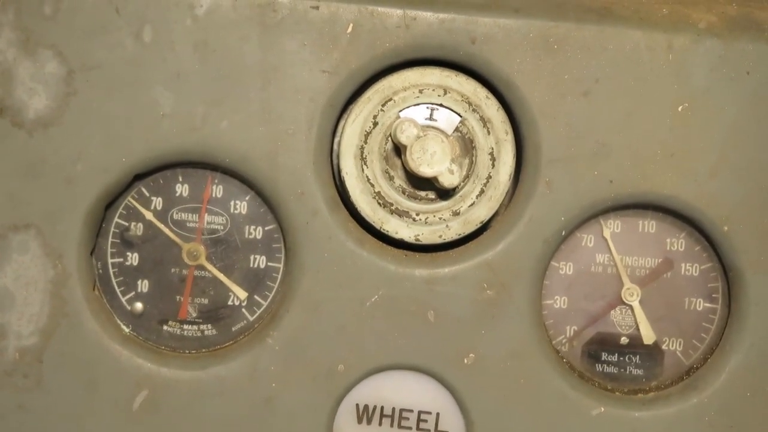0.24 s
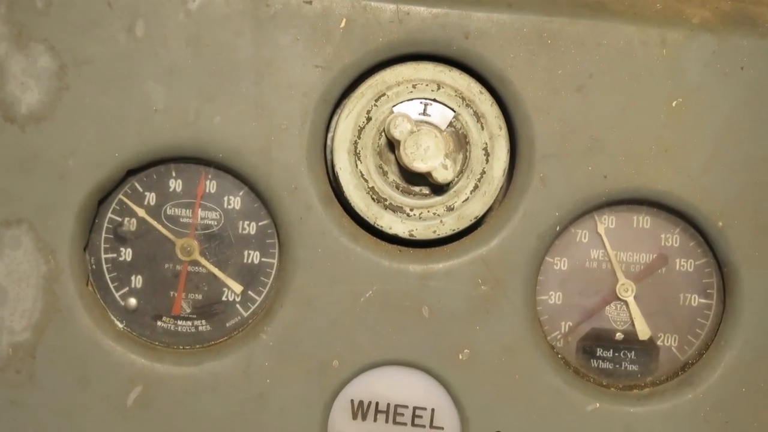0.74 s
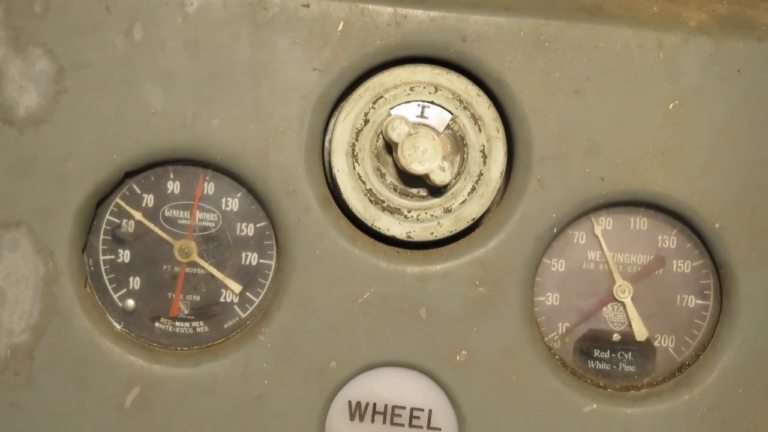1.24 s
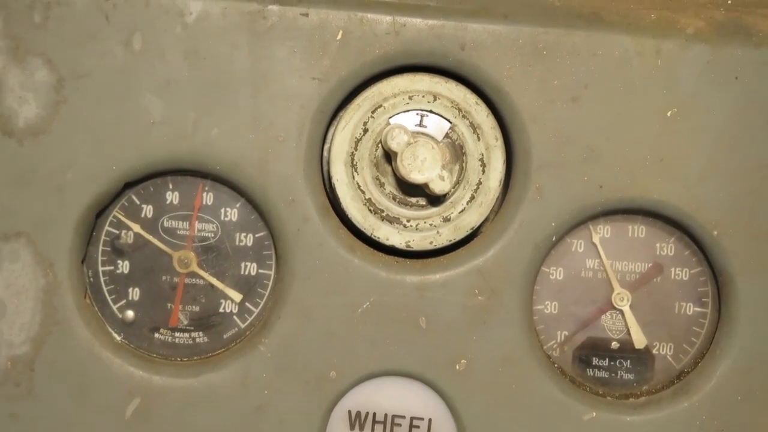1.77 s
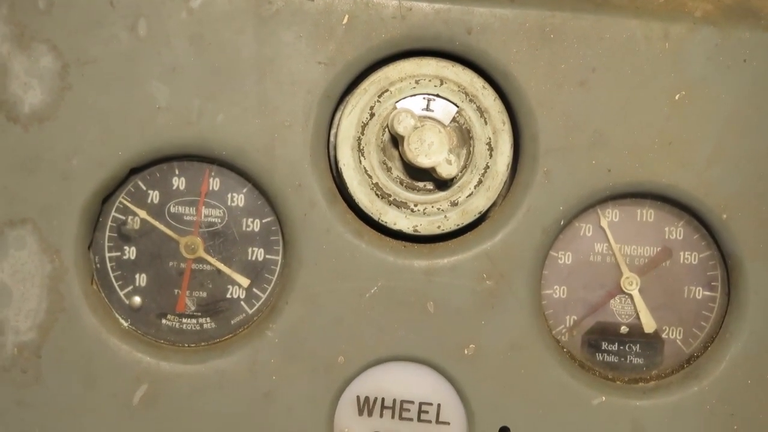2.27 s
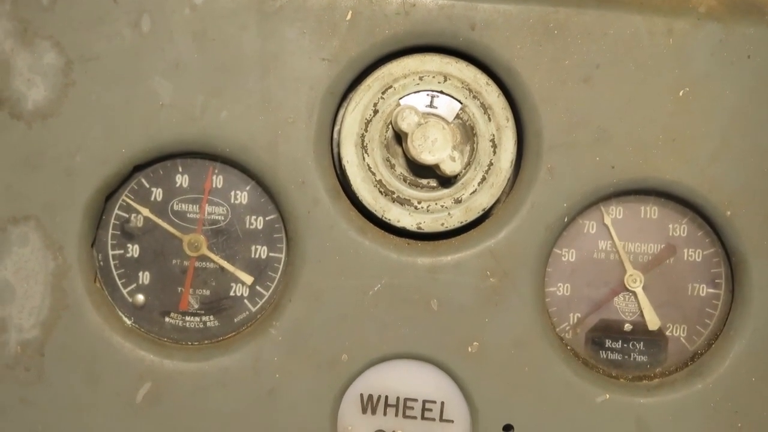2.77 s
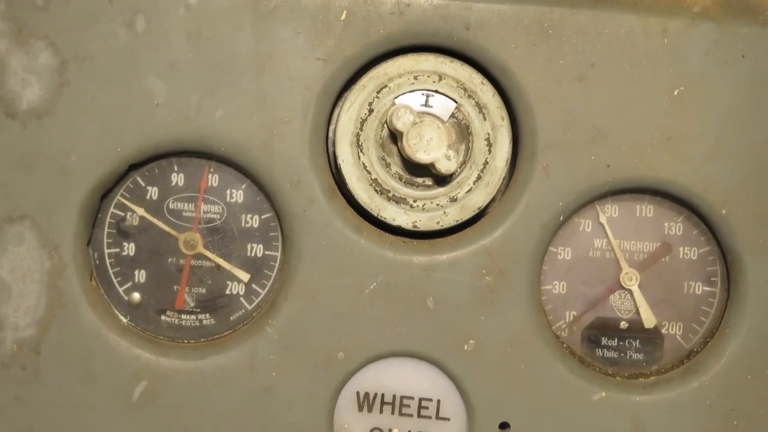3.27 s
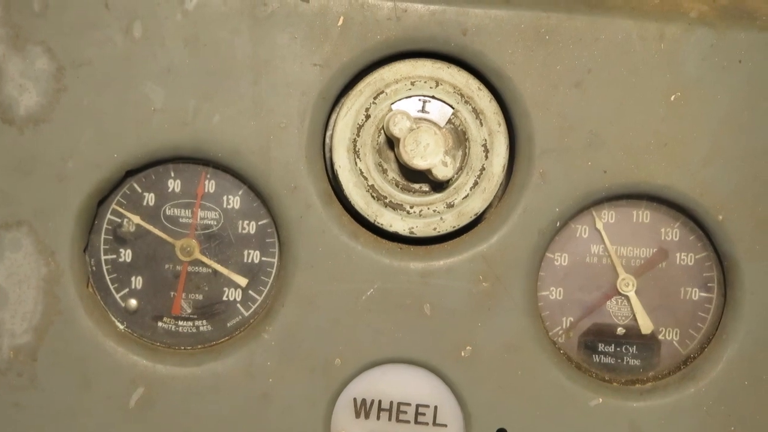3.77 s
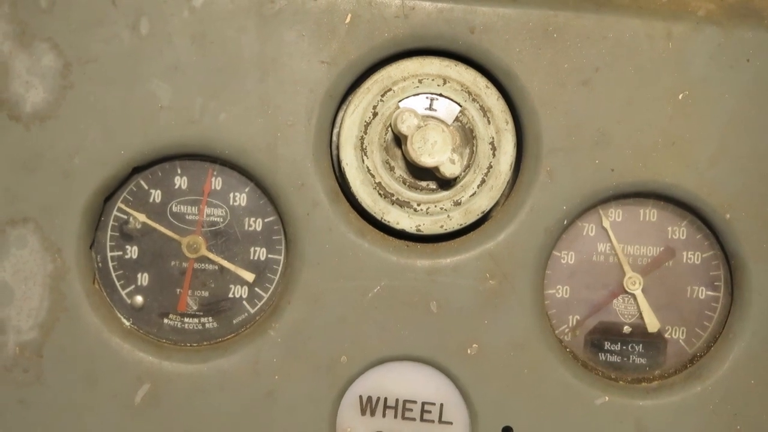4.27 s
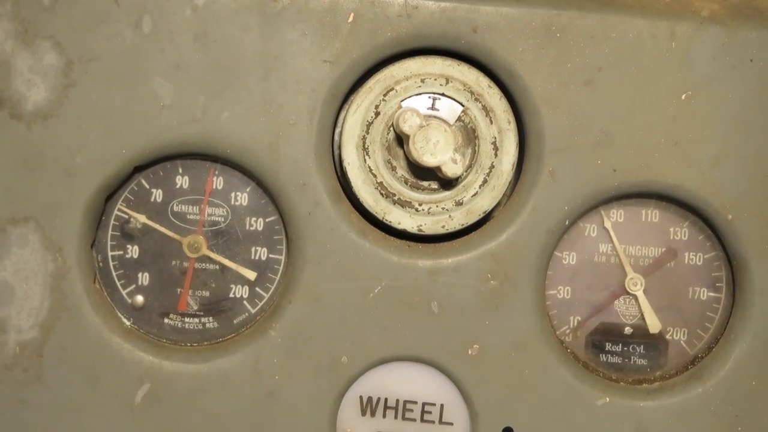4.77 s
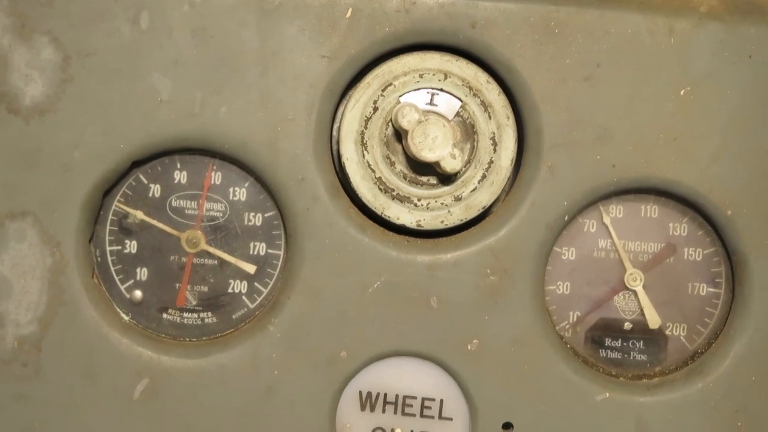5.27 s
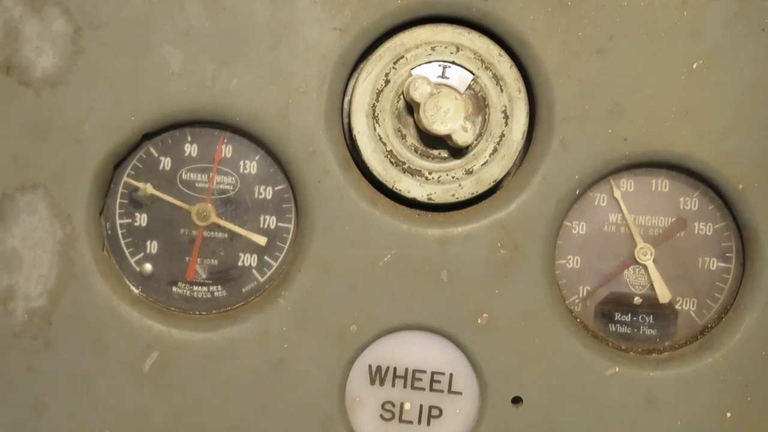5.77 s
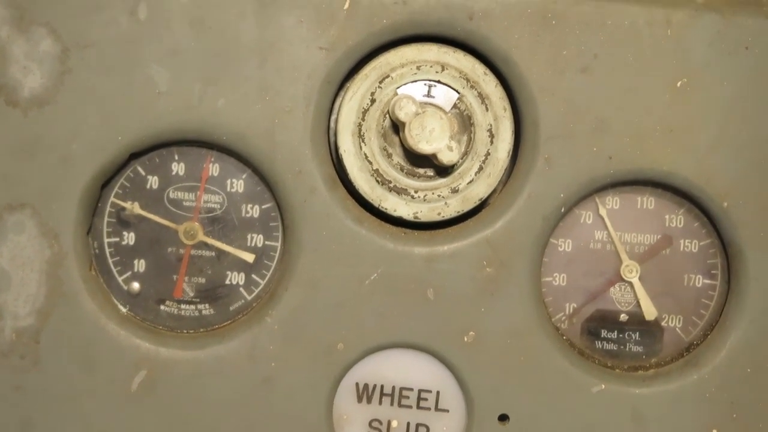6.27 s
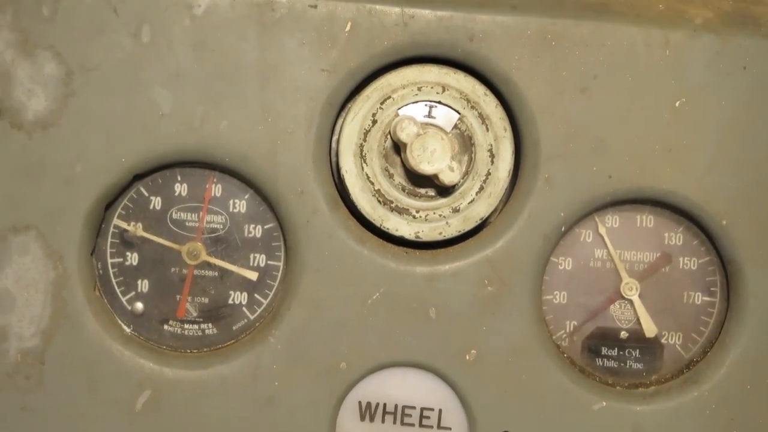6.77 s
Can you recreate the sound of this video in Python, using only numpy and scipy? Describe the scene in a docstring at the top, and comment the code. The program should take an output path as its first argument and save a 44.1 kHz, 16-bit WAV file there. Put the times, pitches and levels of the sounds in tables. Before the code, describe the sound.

Close in a hard steel locomotive cab, compressed air vents through a brake valve as a loud, bright, whistling hiss. Its screechy band slides gradually downward for six seconds. The valve then shuts abruptly, treble vanishing first, leaving a short metallic ring and a dull fading leak. Low idling diesel hum, fans and faint hiss then rise slightly as the microphone's automatic gain recovers.

```python
"""Compressed air vents through a brake valve in the cab of an idling diesel locomotive.
Shaped noise rings the valve body and its exhaust pipe; its brightest band, a screech, slides down over six seconds.
Panel resonances and a short, hard ring, both noise colours or noise tails, place the jet in the steel cab.
Then the valve closes: the treble goes first, then the rest, down to a dull, dying leak.
The camera's gain control waits, then lifts what is left: summed engine tones, noise of fans and a faint hiss."""
import sys
import numpy as np
from scipy import signal
from scipy.fft import rfft, irfft
from scipy.io import wavfile
from scipy.ndimage import uniform_filter1d, map_coordinates

SR = 44100
rng = np.random.default_rng(int(sys.argv[2]) if len(sys.argv) > 2 else 0)


def wrap_up_sound(samples):
    """Save the sound to the file named by the first command line argument, as 16-bit audio."""
    columns = np.atleast_2d(samples).T
    # keep every value between -1 and 1, then stretch to whole-number steps
    tamed = np.clip(columns, -1, 1)
    steps = np.round(tamed * 32767).astype(np.int16)
    wavfile.write(sys.argv[1], SR, steps)


N = 309582
TIME = np.arange(N) / SR
FREQ = np.fft.rfftfreq(2 * N, 1 / SR)

# the open valve: level of the jet at the start, and its slow sag as the air drains
JET_DB, SAG_DB_PER_S = -15.5, 0.103
# the valve first throttles the treble of the jet, then drops onto its seat
THROTTLE_AT_S, THROTTLE_DB_PER_S, THROTTLE_EDGE_HZ = 5.996, 65, 2000
SEAT_AT_S, SEAT_DB_PER_S = 6.055, 378
# the leak past the seat: level against the jet ahead of its own colour, and fade on top of the sag
LEAK_DB, LEAK_FADE_DB_PER_S = -24, 33
# time constant with which the screech flattens once the valve throttles
PEAK_COLLAPSE_S = 0.0061
# the low ring of the pipe weakens as the air drains: lift at the start, sag, upper edge
RING_DB, RING_SAG_DB_PER_S, RING_EDGE_HZ = 2, 0.5, 2200
# the middle whistle swells and sags about twice a second: band, first crest, rate, depth either way
SWELL_HZ, SWELL_WIDTH_HZ = 1680, 98
SWELL_AT_S, SWELLS_PER_S, SWELL_DB = 0.2, 1.9, 1
# all standing waves between the panels are equally sharp
STANDING_WIDTH_HZ = 19.3
# the fringe of the plume hisses apart from its core: level against the core
FRINGE_DB = -5
# steady levels in the cab, ahead of the gain control
ENGINE_DB, CAB_AIR_DB, HIGH_HISS_DB = -68, -66.5, -61
SHAFT_HZ = 18.82
# gain control: low while the sound is over the threshold; after a hold it jumps up, then creeps on
THRESHOLD_DB, HOLD_S = -33, 0.38
JUMP_DB, JUMP_S, CREEP_DB_PER_S = 6.5, 0.022, 5.5
TOP_HZ = 15200


def undb(db):
    """Decibels to gain."""
    return 10 ** (np.asarray(db) / 20)


def unit(x):
    """Scale to rms 1."""
    return x / np.sqrt(np.mean(x ** 2))


def since(start_s):
    """Seconds gone by after a moment, zero before it."""
    return np.maximum(TIME - start_s, 0)


def spectrum(x):
    """Spectrum of a sound followed by silence, leaving room for filters to ring out."""
    return rfft(x, 2 * N)


def wave(bins):
    """Back from a spectrum to sound."""
    return irfft(bins)[..., :N]


def colour(points):
    """Gain at every frequency from (Hz, dB) points."""
    hz, db = np.transpose(points)
    return undb(np.interp(np.log(FREQ + 1), np.log(hz), db))


def bell(hz, width):
    """Steep-sided power response of one resonance, down to a quarter one width from its centre."""
    return 1 / (1 + ((FREQ - hz) / width) ** 2) ** 2


def noise(gain):
    """Noise of rms 1 with the given gain over frequency."""
    return unit(wave(rfft(rng.standard_normal(2 * N)) * gain))


def walk(rate):
    """Smooth random drift of spread 1, with about rate turns a second."""
    return noise(1 / (1 + (FREQ / rate) ** 2))


def jet_colour(low_edge_hz=170):
    """Gain of the jet over frequency: broad turbulence plus resonances, notched where the pipe cancels."""
    # Broad colour of the jet. Each row: frequency in Hz, level in dB.
    broad = [(100, -85), (400, -41.5), (480, -33.5), (720, -25.5), (900, -28.0), (1150, -24), (1400, -16.5),
             (1850, -16.5), (2150, -12.5), (2900, -17), (4150, -6.5), (4750, -11.5), (5300, -4.5),
             (7700, -16), (9400, -11.5), (12000, -2.5), (13500, -2), (15100, -14)]
    # Resonances of valve body and pipe; the two upper whistles are clusters of close, beating strands.
    # Each row: frequency in Hz, width in Hz, level in dB.
    pipe_modes = [(604.7, 19, -10), (1019, 14, -20.5), (1433, 15, -13), (1572, 13.6, -4), (1655, 14, 2),
                  (1672.4, 15.6, -1.5), (1714, 13, -8), (2410, 45, -13.5), (3260, 31, -7), (3501, 22, 0),
                  (3555, 51, 1.5), (3622, 29, -3), (3682, 36, -1.2), (5530, 420, -7), (6100, 440, -7),
                  (6450, 170, 0), (6953, 69, -1), (7730, 156, -2.5), (7970, 94, -6.5), (8790, 290, -4),
                  (10130, 221, 0.5), (11090, 167, -2), (12750, 200, 2), (14300, 98, -7)]
    # Strongest standing waves between the steel panels. Each row: frequency in Hz, level in dB.
    standing_waves = [(5057, 0.5), (5135, -1), (5250, -2), (5340, -0.5), (5491, 3.5), (5545, 0.5),
                      (5803, 2.5), (5943, 3.5), (6266, 0), (6465, 3), (6557, 6), (6939, -0.5), (8796, 4.5),
                      (10191, 4.5), (11138, 4.5), (11332, 6.5), (11488, 7), (12812, 5.5), (12941, 6.5)]
    # Anti-resonances of the pipe. Each row: frequency in Hz, width in Hz, change in dB.
    pipe_nulls = [(1750, 30, -4), (3130, 66, -3.5), (4400, 170, -1), (6870, 70, -3), (7410, 129, -36),
                  (8330, 95, -14), (9640, 70, -10), (10700, 150, -5), (12240, 110, -13)]
    power = colour(broad) ** 2
    power = power + sum(undb(db) ** 2 * bell(hz, width) for hz, width, db in pipe_modes)
    power = power + sum(undb(db) ** 2 * bell(hz, STANDING_WIDTH_HZ) for hz, db in standing_waves)
    nulls_db = sum(db * bell(hz, width) for hz, width, db in pipe_nulls)
    low_cut = FREQ ** 2 / (FREQ ** 2 + low_edge_hz ** 2)
    return np.sqrt(power) * undb(nulls_db) * low_cut


def screech(hz, s, surge=0.066):
    """Lift in dB of the jet's brightest band, which slides down over six seconds and flattens at the throttle."""
    # A narrow screech that breaks, widens and slides down.
    # Each row: time in seconds, centre in Hz, lift in dB, width in octaves.
    jet_peak = [(0, 7100, 6, 0.21), (1.9, 6660, 6, 0.28), (2.2, 6240, 4, 0.28), (3.1, 5100, 3.5, 0.72),
                (4.1, 4200, 3.5, 0.64), (5, 4040, 5, 0.77), (6, 3650, 5, 0.58)]
    times, *columns = np.transpose(jet_peak)
    centre_hz, lift_db, octaves = (np.interp(s, times, column) for column in columns)
    collapse = np.exp(-np.maximum(s - THROTTLE_AT_S, 0) / PEAK_COLLAPSE_S)
    surges = 1 + surge * np.interp(s, TIME, walk(3.9))
    band = np.exp(-(np.log2(hz / centre_hz) / octaves) ** 2)
    return lift_db * surges * collapse * band


def jet(flutter_db=0.37, flutter_hz=25, patchy_db=0.93):
    """Turbulent air rings the pipe, while its brightest band slides down and its eddies make it patchy."""
    air = noise(jet_colour())
    hz, s, frames = signal.stft(air, SR, nperseg=512)
    hz = hz[:, None] + 1  # keeps the logarithm finite
    ring_db = (RING_DB - RING_SAG_DB_PER_S * s) / (1 + (hz / RING_EDGE_HZ) ** 2) ** 2
    swell_band = np.exp(-((hz - SWELL_HZ) / SWELL_WIDTH_HZ) ** 2)
    swell_db = SWELL_DB * np.cos(2 * np.pi * SWELLS_PER_S * (s - SWELL_AT_S)) * swell_band
    # eddies make neighbouring bands swell and sag together
    eddies = uniform_filter1d(rng.standard_normal(frames.shape), size=24, axis=0)
    eddies = unit(uniform_filter1d(eddies, size=20, axis=1))
    lift_db = screech(hz, s) + ring_db + swell_db + patchy_db * eddies
    air = signal.istft(frames * undb(lift_db), SR)[1][:N]
    return unit(air) * undb(flutter_db * walk(flutter_hz))


def wobble(air, depth=0.0012, rate_hz=6):
    """The unsteady flow makes the pitch of the resonances wander a little."""
    place = np.cumsum(1 + depth * walk(rate_hz))
    return map_coordinates(air, [place], order=5, mode="mirror")


def valve(air):
    """Throttling dulls the jet before the seat shuts it off; a dull leak lingers and fades."""
    # Colour of the leak against the jet. Each row: frequency in Hz, level in dB.
    leak_colour = [(600, -1), (1650, 0.5), (2700, 2), (3550, 0), (4100, 2.5), (6000, -6.5), (9000, -8),
                   (14000, -17)]
    bins = spectrum(air)
    lows = wave(bins / (1 + ((FREQ / THROTTLE_EDGE_HZ) ** 2) ** 2))
    throttled = lows + (air - lows) * undb(-THROTTLE_DB_PER_S * since(THROTTLE_AT_S))
    opening = undb(-SEAT_DB_PER_S * since(SEAT_AT_S))
    leak_gain = undb(LEAK_DB - LEAK_FADE_DB_PER_S * since(SEAT_AT_S))
    leak = wave(bins * colour(leak_colour)) * leak_gain
    return (opening * throttled + (1 - opening) * leak) * undb(JET_DB - SAG_DB_PER_S * TIME)


def reflections(early_t60=0.089, late_t60=0.35, late_db=-15):
    """Response of the cab: dense slaps from nearby steel panels, then a weaker ring."""
    early = undb(-60 * TIME / early_t60)
    late = undb(late_db) * undb(-60 * TIME / late_t60)
    response = rng.standard_normal(N) * (early + late)
    return spectrum(response / np.sqrt(np.sum(response ** 2)))


def even(response, size=2000):
    """Keep the fine ripple of a room response, without any broad colour."""
    return response / np.sqrt(uniform_filter1d(np.abs(response) ** 2, size=size))


def stereo(mid, side):
    """Stereo pair from mid and side spectra: nearly mono in the low mids, wide in the treble."""
    # Stereo width by band. Each row: frequency in Hz, side minus mid in dB.
    stereo_width = [(50, -10), (125, -27), (250, -36), (600, -45), (1400, -62), (2300, -25), (2750, -26),
                    (3150, -4), (4500, -1), (5500, 3), (15000, 3)]
    # The sound leans to one side or the other by band. Each row: frequency in Hz, left minus right in dB.
    stereo_lean = [(3000, 0), (3500, -3), (5100, 1), (6400, -1), (6900, 2), (7500, 3), (8700, 3.5),
                   (9700, -2.5), (11300, 6), (12100, -4), (13000, 4.5), (14300, -3.5)]
    ratio, lean = colour(stereo_width), colour(stereo_lean)
    pair = np.array([(mid + ratio * side) * lean, mid - ratio * side])
    return wave(pair / np.sqrt((1 + ratio ** 2) * (1 + lean ** 2) / 2))


def cab_walls(x, low_wet_db=-9, high_wet_db=0):
    """The lows arrive mostly straight; the beamed treble comes more by way of the walls."""
    wet = colour([(1600, low_wet_db), (5000, high_wet_db)])
    source = spectrum(x)
    mid = source * even(1 + wet * reflections())
    side = source * even(reflections())
    return stereo(mid, side)


def engine(wander=0.00117, waver_db=1.5):
    """The idling diesel hums on multiples of its shaft rate, with a thin gear whine."""
    # Engine hum. Each row: multiple of the shaft rate, relative level in dB.
    engine_orders = [(7, -23), (8, -19.5), (9, -16.5), (10, -6), (12, -10), (13, -17), (14, -12.5),
                     (15, -5.5), (16, -2.5), (17, 1.5), (18, -7), (19, -7), (20, -5), (21, -4), (22, -6)]
    # Gear whine. Each row: frequency in Hz, level against the whole hum in dB.
    gear_whine = [(1292, -8), (1356, -20), (1582, -16)]
    clock = np.cumsum(1 + wander * walk(2.1)) / SR  # seconds, running slightly unevenly

    def tones(lines):
        """Sum of sines that share the clock, each wavering in level by itself."""
        return sum(undb(db + waver_db * walk(4.3)) * np.sin(2 * np.pi * (hz * clock + rng.random()))
                   for hz, db in lines)

    hum = tones([(order * SHAFT_HZ, db) for order, db in engine_orders])
    return unit(hum) + np.sqrt(2) * tones(gear_whine)


def diffuse(points, waver_db):
    """A gently wavering rush that arrives from all round the cab."""
    gain = colour(points)
    return stereo(spectrum(noise(gain)), spectrum(noise(gain))) * undb(waver_db * walk(7.1))


def scene():
    """Core and fringe of the plume, each by its own paths through the cab, over engine, fans and a faint hiss."""
    # Rush of fans and machinery in the cab. Each row: frequency in Hz, relative level in dB.
    cab_air = [(30, -24), (90, -33), (170, -5), (250, -6), (310, 3), (420, 3.5), (490, -1), (540, 2),
               (630, 5.5), (900, -1.5), (1350, 1.5), (1800, -8), (2500, -16), (4000, -18), (9000, -33)]
    # Faint steady hiss of the air system. Each row: frequency in Hz, relative level in dB.
    high_hiss = [(1000, -18), (2800, -10.5), (4200, -5), (4500, -7), (4720, 5), (4980, -4), (5400, -8),
                 (7000, -7), (8300, -2), (9600, -4), (11600, 3.5), (13000, -4), (15500, -7)]
    core, fringe = (cab_walls(valve(wobble(jet()))) for _ in range(2))
    plume = (core + undb(FRINGE_DB) * fringe) / np.hypot(1, undb(FRINGE_DB))
    fans = diffuse(cab_air, waver_db=1.5) * undb(CAB_AIR_DB)
    hiss = diffuse(high_hiss, waver_db=0.1) * undb(HIGH_HISS_DB)
    return plume + engine() * undb(ENGINE_DB) + fans + hiss


def gain_control(x):
    """The gain stays down while the sound is loud, and recovers once it has been quiet for the hold time."""
    power = uniform_filter1d(np.mean(x ** 2, axis=0), size=441)  # over 10 ms
    last_loud_s = np.maximum.accumulate(TIME * (power > undb(THRESHOLD_DB) ** 2))
    free_s = since(last_loud_s + HOLD_S)
    lift_db = JUMP_DB * np.minimum(free_s / JUMP_S, 1) + CREEP_DB_PER_S * free_s
    return x * undb(lift_db)


def record(dry):
    """The camera rides its gain and cuts the top steeply."""
    top_cut = signal.ellip(10, .2, 80, TOP_HZ, fs=SR, output="sos")
    return signal.sosfilt(top_cut, gain_control(dry))


dry = scene()
out = record(dry)
wrap_up_sound(out)
```